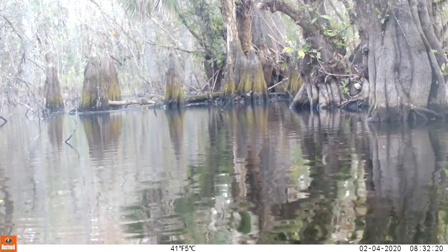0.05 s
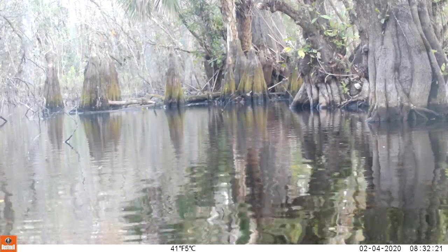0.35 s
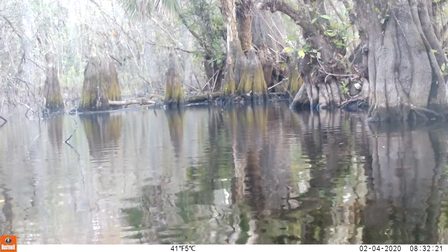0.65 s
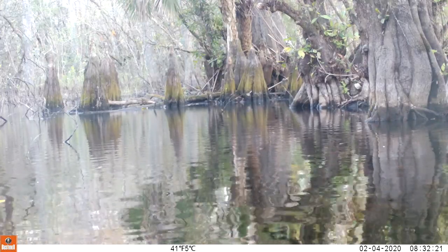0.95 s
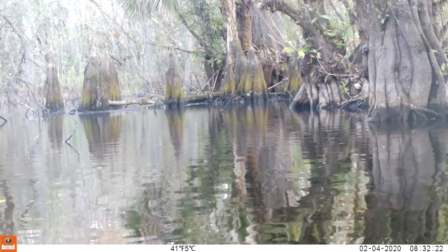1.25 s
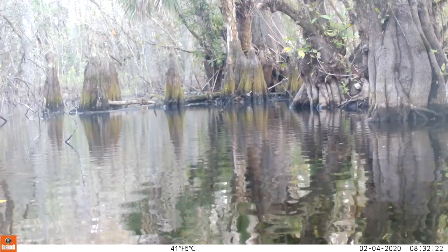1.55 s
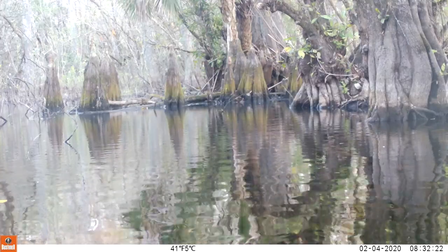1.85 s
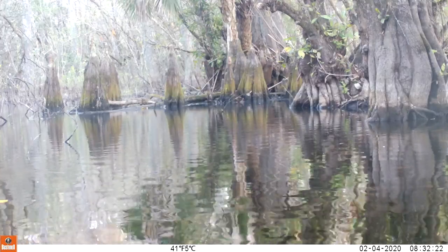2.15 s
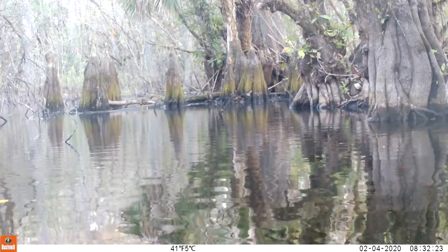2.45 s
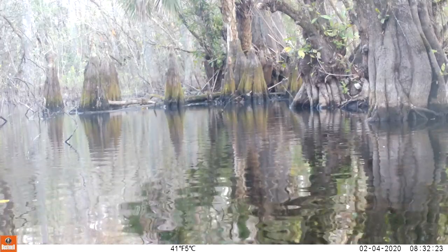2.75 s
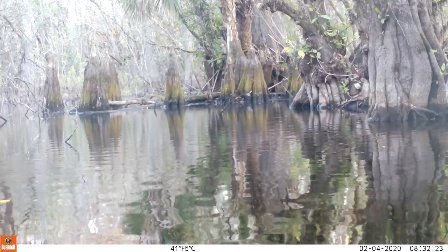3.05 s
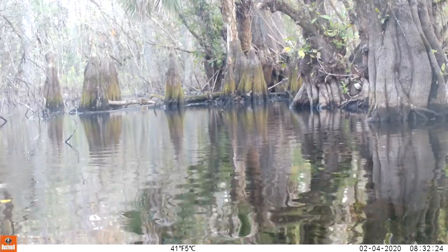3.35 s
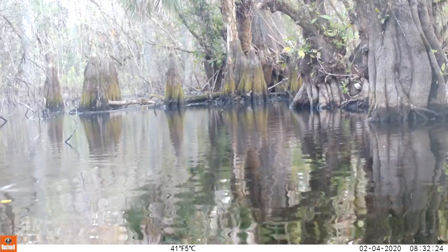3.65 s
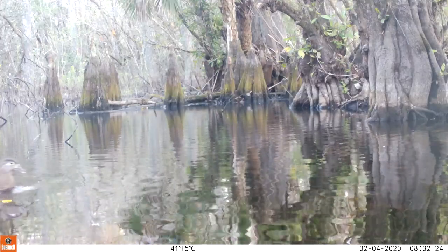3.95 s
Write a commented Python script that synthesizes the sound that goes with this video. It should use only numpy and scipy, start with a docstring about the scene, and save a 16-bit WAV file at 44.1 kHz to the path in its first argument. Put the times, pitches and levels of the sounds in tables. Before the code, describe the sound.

A duck gives one loud rising whistle over the steady hiss of a swamp.

```python
"""A still swamp pool: a steady hiss and low rumble, with a faint, high, insect-like trill that stops
half way and two tiny distant chirps. Near the end a duck gives one loud rising whistle, which starts
almost pure and turns reedy as its overtones sweep through the throat resonances.
Trunks and bank throw back weak echoes of the call."""
import sys
import numpy as np
from scipy import signal
from scipy.fft import rfft, irfft
from scipy.io import wavfile

SR = 44100
rng = np.random.default_rng(int(sys.argv[2]) if len(sys.argv) > 2 else 0)


def to_wav(sig):
    """Store sig (one row per channel, or 1-D mono) as 16-bit WAV at the path in sys.argv[1].

    Samples outside -1..1 are clipped; the rate is SR.
    """
    pcm = np.clip(np.atleast_2d(sig), -1, 1) * 32767
    pcm = np.round(pcm).astype(np.int16)
    wavfile.write(sys.argv[1], SR, pcm.T)  # frames by channels


N = 176400


def from_db(db):
    """Decibels to gain."""
    return 10 ** (np.asarray(db) / 20)


def in_time(rows):
    """One automation curve for each column after the time."""
    seconds, *columns = np.transpose(rows)
    return [np.interp(np.arange(N) / SR, seconds, column) for column in columns]


def at_hz(points, hz):
    """Read an EQ curve in dB on a log-frequency axis."""
    freqs, db = np.transpose(points)
    return np.interp(np.log(np.maximum(hz, 1)), np.log(freqs), db)


def shaped_noise(gain_at):
    """Noise at unit rms, coloured by a function of frequency."""
    hz = np.arange(N // 2 + 1) * SR / N
    noise = irfft(rfft(rng.standard_normal(N)) * gain_at(hz), N)
    return noise / np.sqrt(np.mean(noise ** 2) + 1e-20)


def drift(rate_hz):
    """A random wobble at unit rms, mostly slower than the rate."""
    return shaped_noise(lambda hz: 1 / (1 + (hz / rate_hz) ** 2))


def noise_band(centre_hz, width_hz):
    """Resonant noise: an unsteady tone when narrow, a breathy rush when wide."""
    return shaped_noise(lambda hz: 1 / (1 + ((hz - centre_hz) / width_hz) ** 2))


# The whistle's upward glide. Each row: time in seconds, pitch in Hz.
WHISTLE_PITCH = [(3.55, 440), (3.6, 506.5), (3.64, 571), (3.68, 614), (3.722, 661), (3.785, 695),
                 (3.815, 705.5), (3.89, 754.5), (3.938, 770.3), (3.962, 797.6), (4.0, 815)]
# The swell of the call. Each row: time in seconds, fundamental level in dB, overtone drive in dB.
WHISTLE_EFFORT = [(3.54, -78, -54), (3.59, -55, -40), (3.63, -51, -35), (3.655, -41.5, -33),
                  (3.7, -36.5, -21), (3.725, -34, -10.5), (3.77, -29.5, -8), (3.81, -35, -4.5),
                  (3.845, -36, -1.5), (3.87, -25, -1.5), (3.935, -22, 0), (3.975, -26.5, 1), (4.0, -33, -1)]
# Throat and bill resonances that colour the overtones. Each row: frequency in Hz, gain in dB.
THROAT_EQ = [(1050, -21), (1350, -36), (1560, -34.5), (2000, -38), (2220, -33.5), (2430, -43), (2680, -59),
             (2850, -67), (3000, -46), (3200, -40), (3360, -47), (3850, -44), (4300, -45), (4620, -39),
             (4820, -37.5), (5200, -38.5), (5550, -41.5), (5950, -50), (6500, -49.5), (6750, -51),
             (7000, -44.5), (7300, -57), (7600, -54), (8000, -65), (8450, -59.5), (9400, -69), (11500, -68)]


def duck_whistle(harmonics=15, jitter=.0016, scatter_rad=.8):
    """One rising whistle: a clean fundamental, rough overtones shaped by the throat, a little air."""
    t = np.arange(N) / SR
    pitch, = in_time(WHISTLE_PITCH)
    tone_db, drive_db = in_time(WHISTLE_EFFORT)
    phase = 2 * np.pi * np.cumsum(pitch * (1 + jitter * drift(rate_hz=110))) / SR
    air = from_db(drive_db - 54) * noise_band(centre_hz=5400, width_hz=2400)
    air_pulse = (1 + np.cos(phase)) / 2
    voice = from_db(tone_db) * np.cos(phase) + air * air_pulse
    # The upper overtones break into a brief, faster flutter as the call swells.
    break_db = 4.5 * np.exp(-((t - 3.868) / .038) ** 2)
    for k in range(2, harmonics + 1):
        treble_share = 1 / (1 + (3700 / (k * pitch)) ** 4)
        flutter_db = 1.7 * drift(rate_hz=33) + treble_share * break_db * drift(rate_hz=72)
        gain = from_db(drive_db + at_hz(THROAT_EQ, k * pitch) + flutter_db)
        # The throat shifts the overtones out of step.
        shift = scatter_rad * treble_share * rng.standard_normal()
        voice += gain * np.cos(k * phase + shift)
    return voice * (t > WHISTLE_EFFORT[0][0])


# Short slaps around the pool. Each row: delay in seconds, gain in dB.
ECHO_TAPS = [(.021, -25), (.047, -30), (.083, -34), (.131, -30)]


def swamp_echoes(call):
    """Trunks and bank return a few weak, delayed copies of the call."""
    t = np.arange(N) / SR
    return sum(from_db(db) * np.interp(t - delay, t, call, left=0) for delay, db in ECHO_TAPS)


# Two chirps, the later one made of two notes.
# Each row: peak time in seconds, pitch in Hz, length in seconds, level in dB, bandwidth in Hz.
CHIRP_NOTES = [(.575, 5880, 0.04, -61, 60), (2.997, 5620, .024, -56, 300), (2.995, 6450, 0.018, -59, 300)]


def distant_chirps():
    """Tiny high notes far away, each a band of noise that swells and fades."""
    t = np.arange(N) / SR
    chirps = np.zeros(N)
    for peak_s, hz, length_s, db, width_hz in CHIRP_NOTES:
        swell = np.exp(-(2 * (t - peak_s) / length_s) ** 2)
        chirps += from_db(db) * swell * noise_band(hz, width_hz)
    return chirps


# The trill's close-set tones. Each row: centre in Hz, bandwidth in Hz, level in dB.
TRILL_BANDS = [(5090, 12, -72), (5190, 40, -70.5), (5290, 65, -73)]


def high_trill(end_s=2.17, fade_s=.06):
    """A thin, insect-like shimmer of narrow noise bands that stops half way."""
    gate = np.clip((end_s - np.arange(N) / SR) / fade_s, 0, 1)
    return gate * sum(from_db(db) * noise_band(hz, width) for hz, width, db in TRILL_BANDS)


# The colours of the bed, low and high. Each row: frequency in Hz, relative level in dB.
RUMBLE_EQ = [(18, -2.5), (28, -1), (45, -2.5), (67, 3), (88, -0.2), (105, -4), (150, -6.5), (200, -11),
             (260, -14), (380, -16.5), (500, -18.5)]
HISS_EQ = [(290, -32), (500, -1.5), (638, -1.5), (863, -3.5), (1010, -4), (1310, -5.5), (2100, -7),
           (3280, -8.5), (4020, -7.5), (5200, -10), (5590, -10), (7340, -11), (15500, -12.5)]
# A fader ride on the rumble, with one early bump. Each row: time in seconds, gain in dB.
RUMBLE_RIDE = [(0, 0.8), (.26, -1), (.37, 3.5), (.47, 1), (1.75, 0.7), (2.1, 0), (2.6, .3), (4.0, 0.1)]


def rumble_and_hiss(rumble_db=-47, hiss_db=-51, crossover_hz=500):
    """The bed: low rumble under an even hiss, both barely wavering."""
    ride_db, = in_time(RUMBLE_RIDE)
    rumble = shaped_noise(lambda hz: from_db(at_hz(RUMBLE_EQ, hz)) * (hz < crossover_hz))
    hiss = shaped_noise(lambda hz: from_db(at_hz(HISS_EQ, hz)) * (hz >= crossover_hz))
    rumble *= from_db(rumble_db + ride_db + .66 * drift(rate_hz=3.8))
    hiss *= from_db(hiss_db + .47 * drift(rate_hz=28))
    return rumble + hiss


def scene():
    """The duck up front and the quiet swamp behind, the same in both channels."""
    call = duck_whistle()
    mono = call + swamp_echoes(call) + distant_chirps() + high_trill() + rumble_and_hiss()
    return np.stack([mono, mono])


def record(dry):
    """A steep low-pass takes the very top off the mix."""
    cutoff_hz = 15800
    return signal.sosfilt(signal.ellip(12, .1, 70, cutoff_hz, fs=SR, output="sos"), dry)


dry = scene()
out = record(dry)
to_wav(out)
```